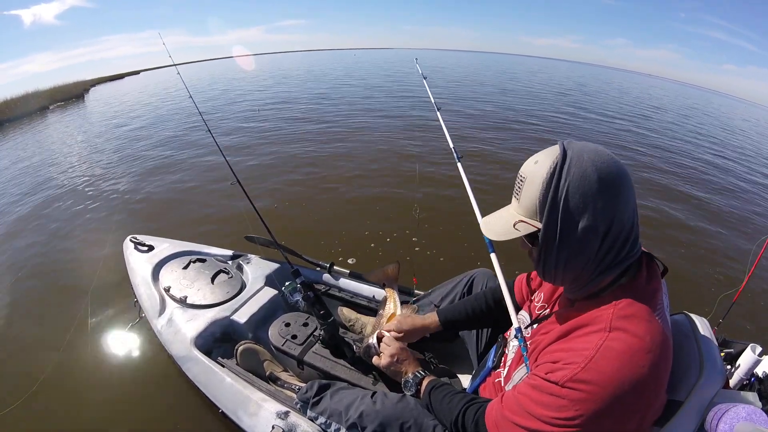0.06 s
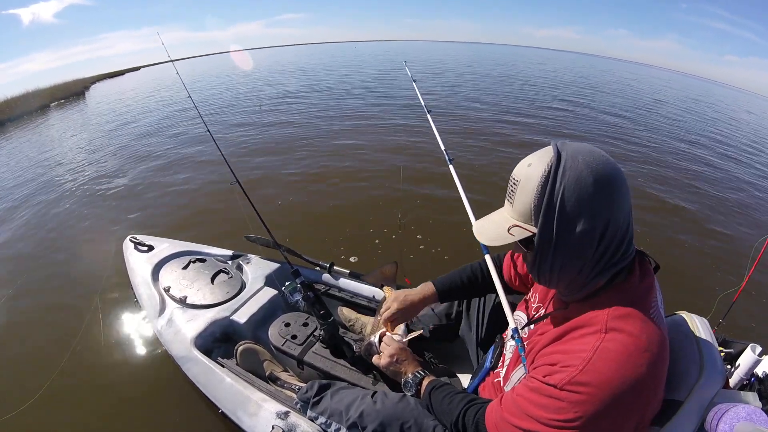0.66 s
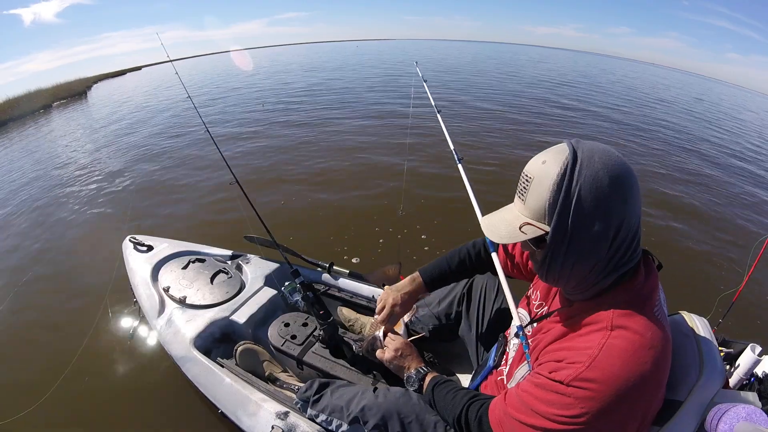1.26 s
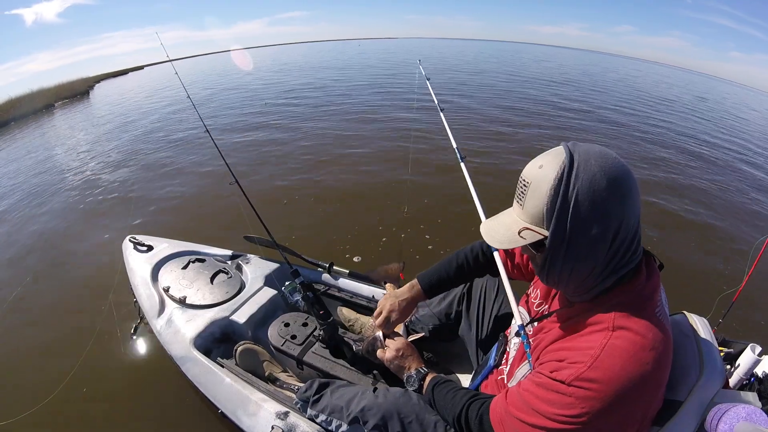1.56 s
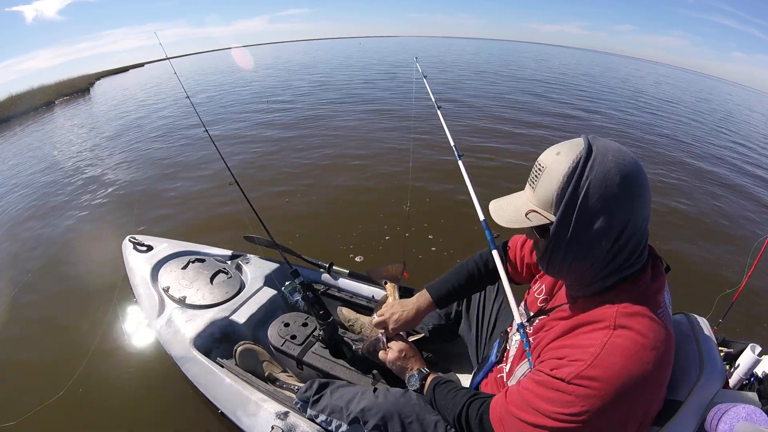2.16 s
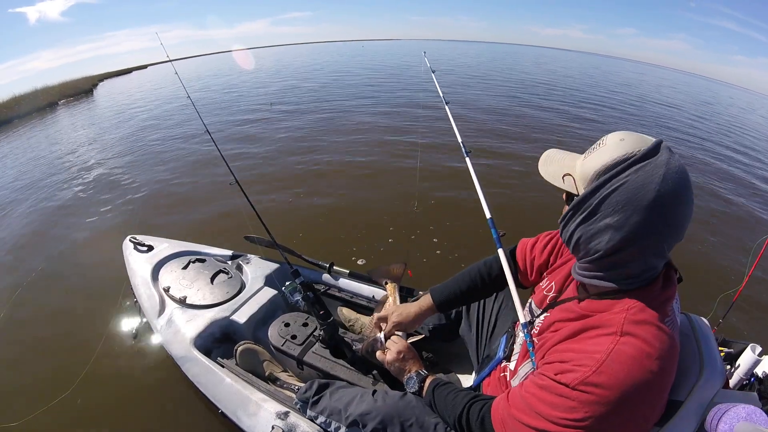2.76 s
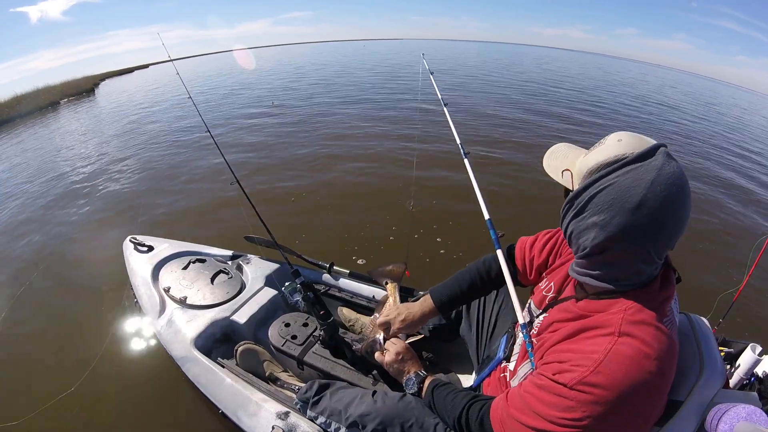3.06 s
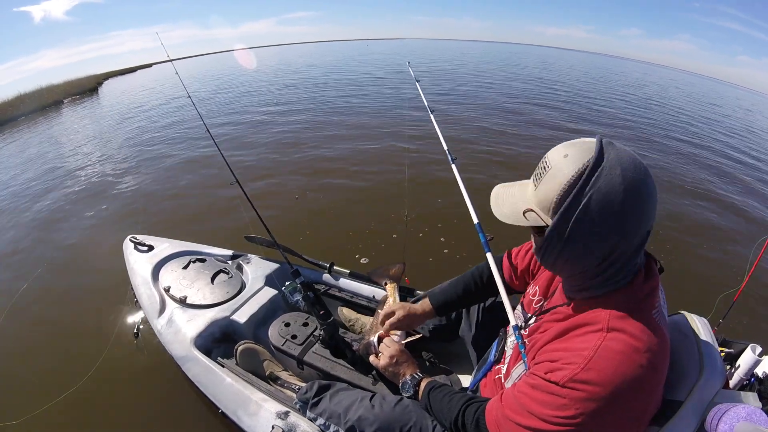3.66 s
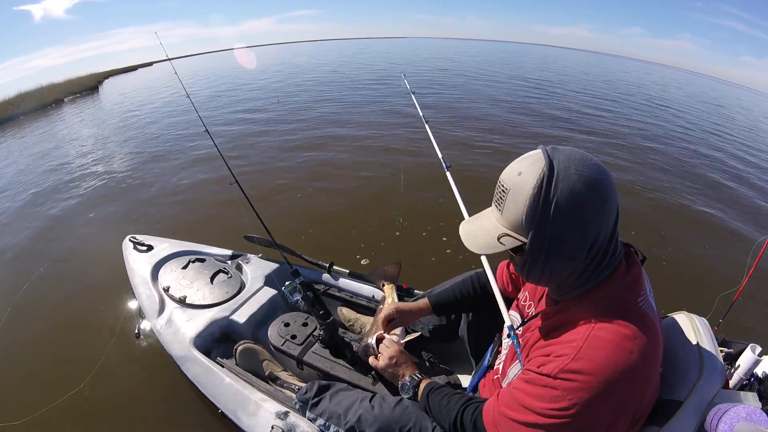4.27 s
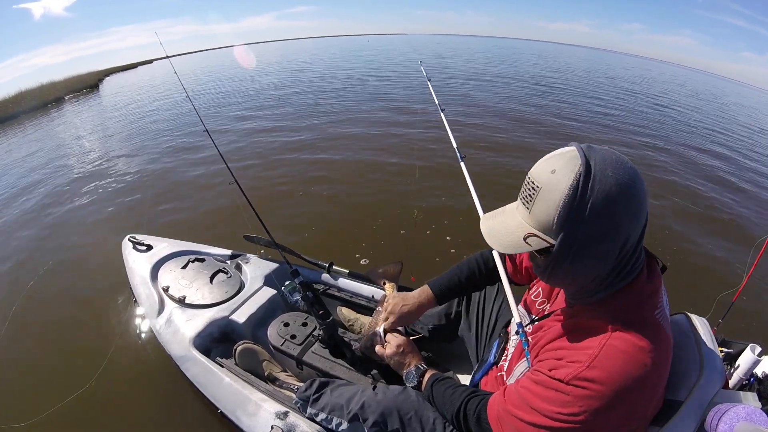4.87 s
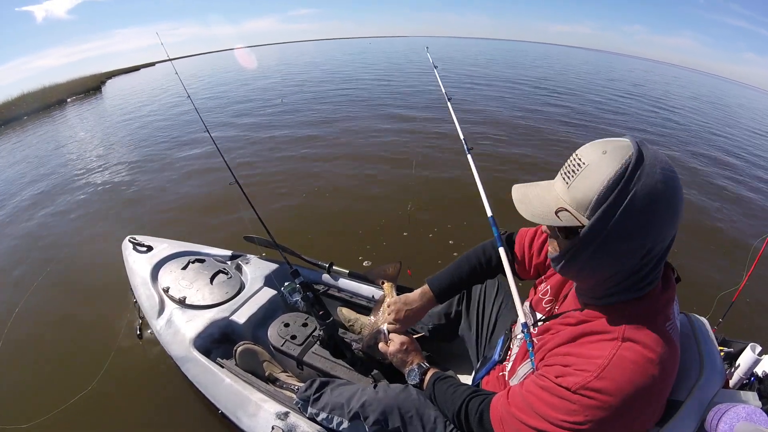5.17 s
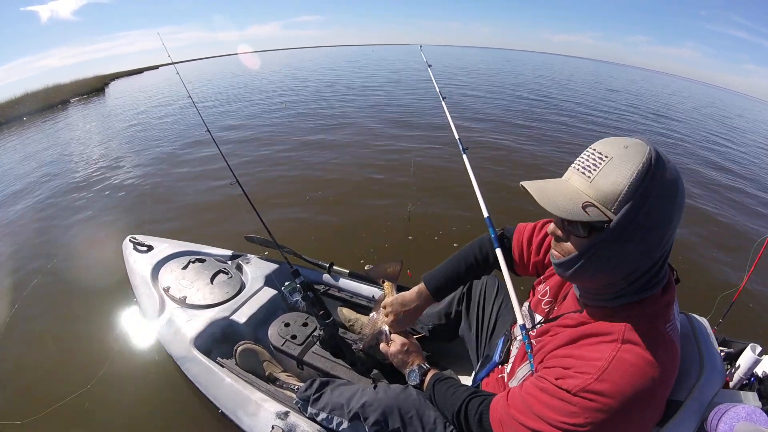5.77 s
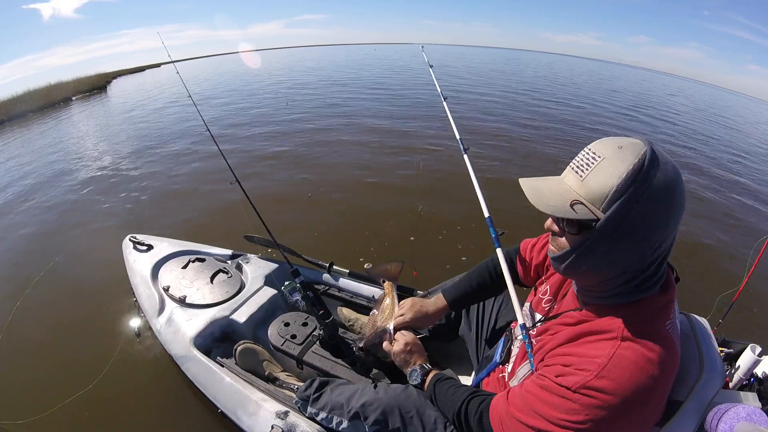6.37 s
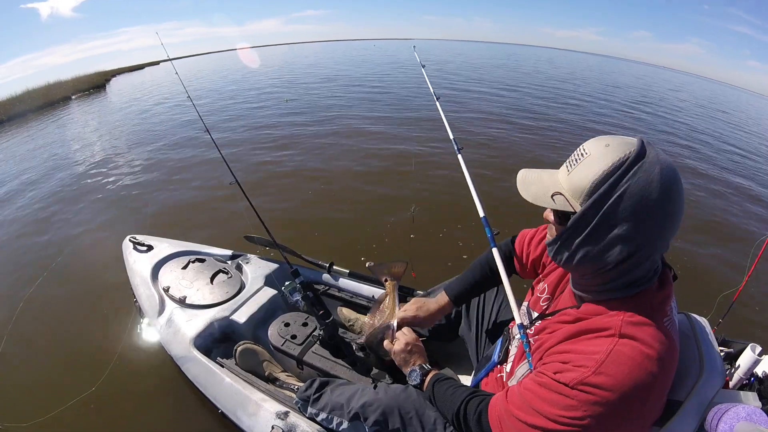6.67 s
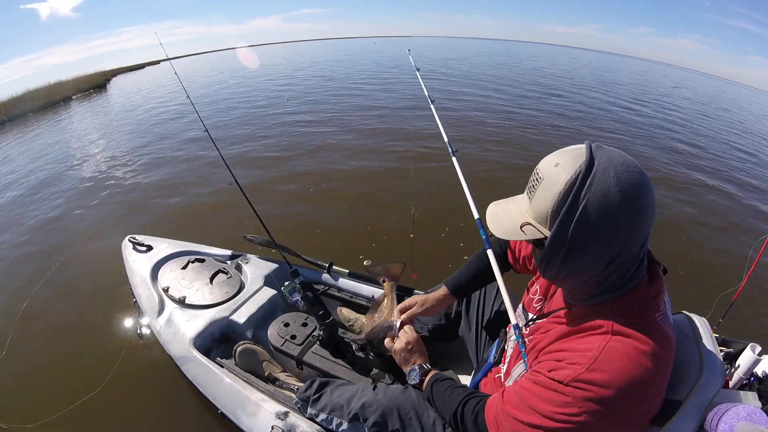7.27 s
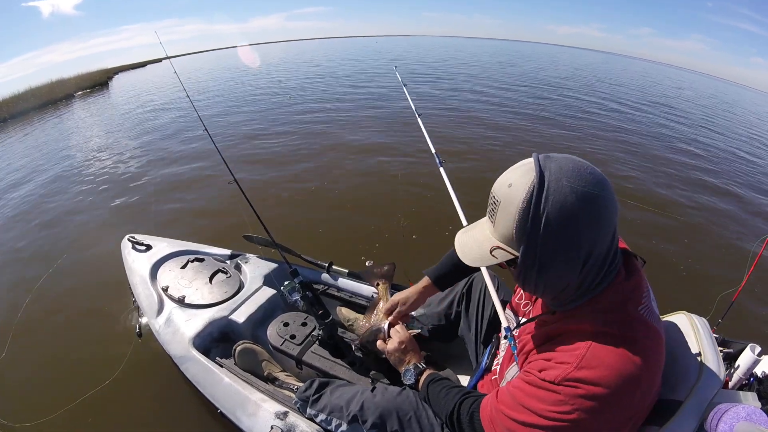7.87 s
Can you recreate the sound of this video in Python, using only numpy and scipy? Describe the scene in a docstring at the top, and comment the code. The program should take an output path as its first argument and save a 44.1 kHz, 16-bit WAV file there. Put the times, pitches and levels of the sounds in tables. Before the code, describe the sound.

On calm open water, light air on the microphone and a faint hiss lie under a low pulsing hum, like a drumming fish or a distant motor. It rises, holds and later sinks, joined by a very thin whine and a growing deep drone. Small tackle ticks and faint rubs of hands on scales come now and then, with a single sharp knock late on.

```python
"""A fish held in a kayak

On calm open water a low drumming hum, from the fish or perhaps a far boat, climbs, holds and sags.
Its pulse rate sets its harmonics; a thin whine, a dull turbulent rush and a deeper drone go with it.
A drop sounds a bubble note, hands rub on scales, and tackle ticks faintly and rings in one knock.
Light air on the microphone and a steady hiss lie beneath."""
import sys
import numpy as np
from scipy import signal
from scipy.fft import rfft, irfft, next_fast_len
from scipy.io import wavfile
from scipy.ndimage import uniform_filter1d, map_coordinates

SR = 44100
rng = np.random.default_rng(int(sys.argv[2]) if len(sys.argv) > 2 else 0)


def master_out(mix):
    """Clip the mix to full scale and print it as 16-bit PCM to the path in sys.argv[1]."""
    frames = np.transpose(np.atleast_2d(mix))
    ceiling = np.clip(frames, -1, 1)
    pcm = np.round(ceiling * 32767).astype(np.int16)
    wavfile.write(sys.argv[1], SR, pcm)


N = 357651

# Noise spectra: f/Hz, relative density level/dB
BREEZE_SPECTRUM = [(12, -14), (25, -5.5), (40, -0.5), (55, -1.5), (100, -0.5), (150, -3.5), (300, -32.5)]
GUST_SPECTRUM = [(14, -20), (26, 6), (40, 0), (65, -27), (120, -38)]
WATER_SPECTRUM = [(100, 4.5), (500, 1), (900, -3.5), (1500, -6.5), (1900, -8), (2600, -11), (3400, -15),
                  (4300, -20.5), (5500, -18), (7000, -26), (9000, -56)]
HISS_SPECTRUM = [(4000, -31), (5600, -18.5), (6100, -11.5), (6500, 1.5), (7000, -6), (8000, -8),
                 (9000, -10.5), (10400, -18), (12000, -14), (13200, -21), (14400, -36)]
RUSH_BODY_SPECTRUM = [(60, -35), (140, -25), (175, -8), (240, -0.5), (300, -6), (370, -7), (480, -14),
                      (800, -39.5)]
RUSH_UPPER_SPECTRUM = [(200, -36), (400, -3), (520, 2.5), (660, 0.5), (850, -8.5), (1100, -14), (1350, -17),
                       (2000, -19.5), (4000, -42)]
RUSH_HOLLOW_SPECTRUM = [(145, -29), (165, -3.5), (195, -0.5), (240, -16)]
FRICTION_SPECTRUM = [(900, 0), (1800, 6), (2600, -3), (4000, -3), (6000, -8), (9000, -10)]
# Glides of the hum, the drone and the whine: t/s, f/Hz
PULSE_RATE = [(0.0, 82), (.16, 91.5), (.35, 97.5), (0.5, 104.6), (.8, 118.5), (1.05, 128.6), (1.25, 130),
              (1.5, 130.2), (1.95, 135.6), (2.5, 132.9), (2.95, 134.8), (3.3, 132.4), (3.9, 134.8),
              (4.4, 135.0), (5.25, 138.4), (5.78, 137.0), (6.0, 131.0), (6.33, 118.2), (7.1, 125.8),
              (7.4, 122.3), (7.7, 114.8), (8.11, 108)]
DRONE_GLIDE = [(0, 62), (2.0, 70), (3.2, 84), (4.0, 85), (5.3, 86), (6.3, 86.5), (7.3, 87), (7.55, 83.5),
               (7.87, 80), (8.11, 72)]
WHINE_GLIDE = [(0, 1270), (.62, 1560), (.78, 1705), (1.0, 1828), (1.15, 1875), (1.5, 1890), (1.6, 1903),
               (1.75, 1878), (2.0, 1912), (2.5, 1875), (3.15, 1925), (5.65, 2000), (5.97, 1922),
               (6.4, 1750), (6.9, 1800), (7.5, 1755), (8.11, 1620)]
# Dips of the hum's fundamental: t/s, depth/dB, half-width/s
HUM_DIPS = [(0.0, -0.5, 0.17), (0.946, 4.5, 0.04), (1.116, 10, 0.11), (1.355, 7, 0.024), (1.5, 6.5, 0.15),
            (2.1, 1.5, 0.23), (6.383, 5, 0.055), (6.666, 3.5, 0.14), (6.802, 5, .025), (7.147, 2, 0.13),
            (7.47, 7, 0.15), (7.67, 10, 0.035), (7.98, 17, 0.048)]
# Surges of the fundamental: t/s, gain/dB, half-width/s
HUM_SURGES = [(.55, 2, 0.22), (3.93, 3, 0.98), (6.165, 2, 0.16), (7.82, 1.5, .09)]
# Swells of the second harmonic: t/s, level/dB, half-width/s
OCTAVE_SWELLS = [(.42, -54.5, .28), (.87, -54.5, .2), (2.0, -58.5, .7), (3.1, -55.5, .7), (4.8, -64, .8),
                 (6.7, -56, .35), (8.05, -58, .15)]
# Partials of the faint buzz: multiple of the pulse rate, relative level/dB
BUZZ_PARTIALS = [(1.5, 13.5), (2.25, 8), (2.5, 5), (3.33, -3.5), (3.67, -5), (4, 0.5), (5.79, -1.5),
                 (6.75, -9), (7.5, -7), (9, -8.5), (10, -6.5), (11, -11.5)]
# Partials of the early rasp: multiple of the pulse rate, level/dB
RASP_PARTIALS = [(1.651, -57.5), (2.6, -68), (3.251, -72), (3.6, -66), (4.002, -66), (4.45, -74), (5, -70),
                 (5.751, -69.5)]
# Passing overtones of the drone: multiple of its frequency, level/dB, t/s, half-width/s
CROAK_PARTIALS = [(2, -52, 4.1, 1.0), (2.333, -55, 6.7, .5), (2.667, -53, 5.3, .8), (2.667, -51.5, 7.0, .8),
                  (2.9, -51, 1.83, .11), (3, -55, 4.1, 1.1), (3, -50, 7.5, .7), (3.333, -55.5, 7.1, .6),
                  (4, -57.5, 5.45, .6), (4.667, -60, 6.7, .6)]
# Flares of the whine: t/s, level/dB, half-width/s
FLARES = [(.77, -75, .035), (1.015, -67.5, .03), (1.5, -70.5, .15), (1.85, -72, .18), (2.44, -74.5, .12),
          (3.1, -78, .17), (5.7, -75, .09), (5.97, -72.5, .09), (6.85, -76, .09)]
# Light tackle contacts: t/s, peak level/dB, lower f/Hz, upper f/Hz
CONTACTS = [(1.476, -52.5, 1500, 3100), (1.5264, -59, 3800, 6300), (1.534, -58, 4700, 6400),
            (1.548, -45, 3700, 6700), (1.5973, -50.5, 1500, 2700), (1.8726, -53.5, 4500, 6500),
            (1.907, -60, 4300, 6200), (1.942, -56, 4200, 6600), (1.961, -53, 4600, 6500),
            (2.6244, -60, 2800, 5200), (2.7876, -57.5, 3900, 6400), (2.812, -59.5, 3100, 5300),
            (2.8454, -55.5, 1400, 2800), (3.023, -51, 4300, 6500), (3.6706, -57.5, 4200, 6400),
            (4.252, -45.5, 4800, 7100), (4.2837, -52.5, 4500, 7000), (6.0163, -48, 4500, 6800),
            (6.0925, -58, 3600, 5800), (6.1094, -59, 2900, 5200), (6.2355, -47.5, 4700, 6200),
            (6.244, -58, 3400, 5800), (6.254, -54.5, 4400, 5600), (6.8548, -56, 1500, 3200),
            (7.2944, -58, 2900, 5200)]
# Strokes of the hands on the fish: t/s, level/dB, half-width/s
STROKES = [(1.535, -66.5, 0.049), (2.802, -72, 0.023), (6.858, -63, 0.015), (8.065, -66, 0.027)]
# First touch, blow and rebound of the knock: t/s, gain/dB
IMPACTS = [(6.2764, -48.5), (6.2785, -40), (6.2825, -52)]
# Modes of the struck tackle: f/Hz, relative level/dB, T60/s
TACKLE_MODES = [(780, 0, 0.039), (920, -8, 0.026), (1800, -6, 0.046), (1890, -8, 0.028),
                (2470, -6.5, 0.018), (3310, -10, 0.018), (3540, -5.5, 0.016), (3900, -2, 0.016),
                (4690, -1, 0.016), (5100, -4, 0.018), (5800, -5, 0.016), (6460, -6, .018)]

CRUISE_HZ, TOP_HZ = 135, 14200  # pulse rate about which the hum holds; band limit
TIME = np.arange(N) / SR


def amp(db):
    """Amplitude ratio of a level in decibels."""
    return 10 ** (np.asarray(db) / 20)


def unit(x):
    """Normalisation to rms 1."""
    return x / np.sqrt(np.mean(x ** 2) + 1e-20)


def glide(points):
    """Linear interpolation of (t, f) points, one frequency per sample."""
    return np.interp(TIME, *np.transpose(points))


def phase_of(hz):
    """Phase is the time integral of angular frequency."""
    return 2 * np.pi * np.cumsum(hz) / SR


def bump(s, width_s):
    """Gaussian envelope: 1 at time s, 1/e at width_s to either side."""
    return np.exp(-((TIME - s) / width_s) ** 2)


def wobble(rate):
    """Smooth random modulation, with rate knots a second."""
    knots = rng.standard_normal(int(N * rate / SR) + 4)
    return map_coordinates(knots, [TIME * rate])


def filtered(x, response):
    """Linear filtering multiplies the spectrum by a frequency response."""
    size = next_fast_len(N + 8192)
    return irfft(rfft(x, size) * response(np.fft.rfftfreq(size, 1 / SR)), size)[:N]


def noise(spectrum):
    """White noise filtered to a spectral envelope, at rms 1."""
    f, db = np.transpose(spectrum)
    response = lambda hz: amp(np.interp(np.log(hz + 1), np.log(f), db, left=-120, right=-120))
    return unit(filtered(rng.standard_normal(N), response))


def add(track, s, sound):
    """Superposition of a short sound on the track at time s."""
    part = track[round(s * SR):][:len(sound)]
    part += sound[:len(part)]


def tone(phase, blur, rate):
    """Scattering over the water broadens a spectral line: a direct tone plus a random part, at rms 1."""
    phase = phase + rng.uniform(0, 2 * np.pi)
    in_phase = (1 + blur * wobble(rate)) * np.sin(phase)
    quadrature = blur * wobble(rate) * np.cos(phase)
    return unit(in_phase + quadrature)


def mellow(from_s=3.54, to_s=5.63, fade_s=0.43):
    """Trapezoidal envelope, 0 to 1, of the mid-way stretch in which the overtones recede."""
    return np.clip(0.5 + np.minimum(TIME - from_s, to_s - TIME) / fade_s, 0, 1)


def build_db(peak_s=6.81, rise_db=11.5, shape=1.31, ebb_db_per_s=2):
    """Level relative to the peak: a flattening power-law rise, then a steady ebb."""
    before, after = np.maximum(peak_s - TIME, 0), np.maximum(TIME - peak_s, 0)
    return -rise_db * (before / peak_s) ** shape - ebb_db_per_s * after


def background():
    """Pressure fluctuations of air on the microphone rumble under open-water noise and its own hiss."""
    lull_db = 1.5 * bump(7.1, 0.99)
    breeze = amp(-50 - lull_db) * noise(BREEZE_SPECTRUM)
    gust = amp(-44) * bump(0.04, 0.17) * noise(GUST_SPECTRUM)
    return breeze + gust + amp(-62) * noise(WATER_SPECTRUM) + amp(-66) * noise(HISS_SPECTRUM)


def hum():
    """Periodic drumming gives harmonics of its pulse rate; buzz and rasp add partials among and above."""
    pulse_hz = glide(PULSE_RATE)
    phase = phase_of(pulse_hz)

    def gain(db, db_per_hz, mellow_db, build_share=0):
        """Amplitude of a component, coupled to the pulse rate, the mellow stretch and the build."""
        rate_db = db_per_hz * (pulse_hz - CRUISE_HZ)
        return amp(db + rate_db - mellow_db * mellow() + build_share * build_db())

    dip_db = sum(db * bump(s, width) for s, db, width in HUM_DIPS)
    surge_db = sum(db * bump(s, width) for s, db, width in HUM_SURGES)
    bright = amp(4 * bump(2.83, 0.56))
    ring_out = amp(-69.5) * bump(1.4, 0.43)  # at the top of the climb
    # amplitude envelopes of the harmonics
    first = gain(-38, db_per_hz=0.2254, mellow_db=1) * amp(surge_db - dip_db)
    second = sum(amp(db) * bump(s, width) for s, db, width in OCTAVE_SWELLS)
    third = gain(-53.5, db_per_hz=0.2, mellow_db=4, build_share=0.7) * bright * amp(-0.31 * dip_db)
    fifth = gain(-75, db_per_hz=-0.05, mellow_db=6, build_share=0.15) + ring_out
    harmonics = (first * tone(phase, blur=0.033, rate=20)
                 + second * tone(2 * phase, blur=0.12, rate=12)
                 + third * tone(3 * phase, blur=0.04, rate=14)
                 + fifth * tone(5 * phase, blur=0.2, rate=14))
    buzz = sum(amp(db) * tone(ratio * phase, blur=2, rate=36) for ratio, db in BUZZ_PARTIALS)
    buzz *= gain(-73, db_per_hz=0.5, mellow_db=3) * bright
    rasp = sum(amp(db) * tone(ratio * phase, blur=0.25, rate=18.2) for ratio, db in RASP_PARTIALS)
    return harmonics + buzz + bump(0.71, 0.36) * rasp


def whine():
    """Strong random modulation spreads a high tone into a fuzzy thread; less of it gives clear flares."""
    phase = phase_of(glide(WHINE_GLIDE))
    thread = amp(-80 - 3 * mellow()) * tone(phase, blur=2.5, rate=70)
    flares = sum(amp(db) * bump(s, width) for s, db, width in FLARES)
    return thread + flares * tone(phase, blur=0.6, rate=55)


def rush(db_per_hz=0.11):
    """Turbulence gives broadband noise; it builds, and its upper band's level follows the pulse rate."""
    rate_db = db_per_hz * (glide(PULSE_RATE) - CRUISE_HZ)
    surge_db = 3.5 * bump(5.47, 0.96)
    upper_db = -59.5 + 0.29 * build_db() + rate_db + surge_db - 2 * mellow()
    hollow = amp(-54.5) * bump(3.5, 3.1) * noise(RUSH_HOLLOW_SPECTRUM)
    body = amp(-48 + build_db()) * noise(RUSH_BODY_SPECTRUM)
    upper = amp(upper_db) * noise(RUSH_UPPER_SPECTRUM)
    return hollow + body + upper


def drone():
    """A deep wavering tone builds with the rush; closely spaced overtones give a croaking roughness."""
    phase = phase_of(glide(DRONE_GLIDE))
    croak = sum(amp(db) * bump(s, width) * tone(ratio * phase, blur=0.5, rate=20)
                for ratio, db, s, width in CROAK_PARTIALS)
    ebb_db = 3.5 * bump(8.2, 0.8)
    level_db = -48.5 + 1.17 * build_db() - ebb_db
    return amp(level_db) * tone(phase, blur=0.57, rate=20) + croak


def drip(s=1.133, db=-60, hz=791, width_s=0.016):
    """Bubble resonance gives a falling drop one soft, brief note."""
    return amp(db) * bump(s, width_s) * np.sin(2 * np.pi * hz * TIME)


def ticks(t60=0.011, attack_s=0.00035):
    """Brief hard contacts have broad spectra: each tick of tackle is a decaying band of noise."""
    track, t = np.zeros(N), np.arange(SR // 16) / SR
    envelope = amp(-60 * t / t60) * (1 - np.exp(-t / attack_s))
    for s, db, low_hz, high_hz in CONTACTS:
        band = signal.butter(3, [low_hz, high_hz], "bandpass", fs=SR, output="sos")
        burst = signal.sosfilt(band, envelope * rng.standard_normal(len(t)))
        add(track, s, amp(db) * burst / np.abs(burst).max())
    return track


def rubs(grain_db=3):
    """Sliding friction of skin on scales makes brief swells of grainy noise."""
    strokes = sum(amp(db) * bump(s, width) for s, db, width in STROKES)
    grain = amp(grain_db * wobble(250))
    return strokes * unit(grain * noise(FRICTION_SPECTRUM))


def knock(attack_s=0.00048, crack_db=-3, crack_t60=0.0086):
    """Impacts milliseconds apart excite the tackle's damped modes and fuse into one knock."""
    track, t = np.zeros(N), np.arange(SR // 8) / SR
    onset = 1 - np.exp(-t / attack_s)
    for s, db in IMPACTS:
        ring = sum(amp(mode_db - 60 * t / t60) * np.sin(2 * np.pi * hz * t + rng.normal(0, 1))
                   for hz, mode_db, t60 in TACKLE_MODES)
        softened_noise = uniform_filter1d(rng.standard_normal(len(t)), size=4)
        crack = amp(crack_db - 60 * t / crack_t60) * softened_noise
        add(track, s, amp(db) * onset * (ring + crack))
    return track


def scene():
    """Sound pressures superpose at a single microphone."""
    return (background() + hum() + whine() + rush() + drone() + drip() + ticks() + rubs() + knock())[None]


def record(dry):
    """An ideal low-pass filter removes everything above the band limit."""
    return filtered(dry[0], lambda hz: hz < TOP_HZ)[None]


dry = scene()
out = record(dry)
master_out(out)
```